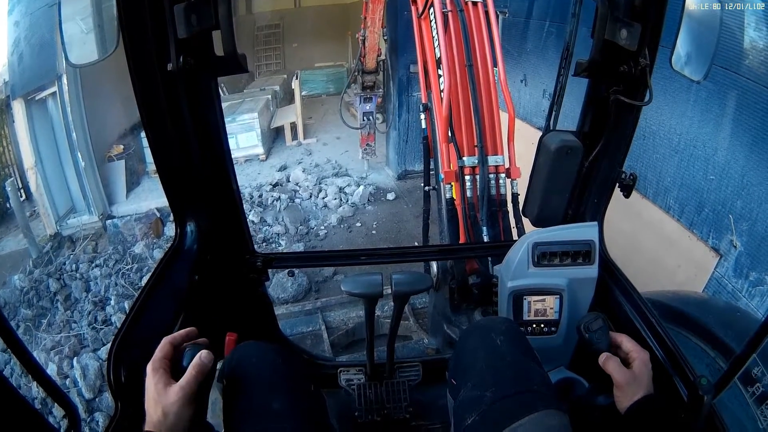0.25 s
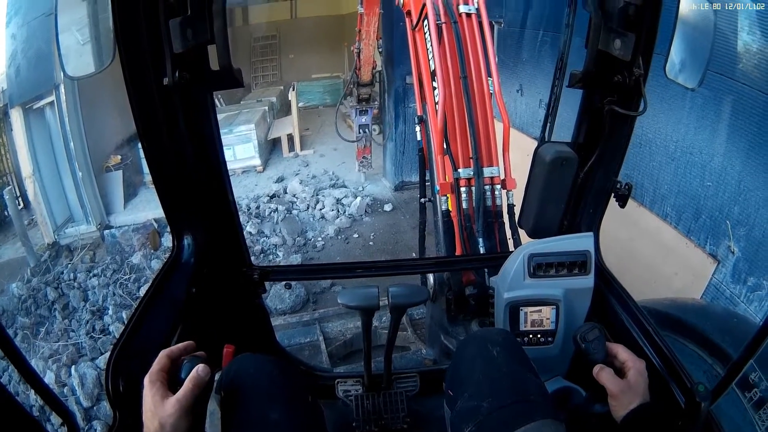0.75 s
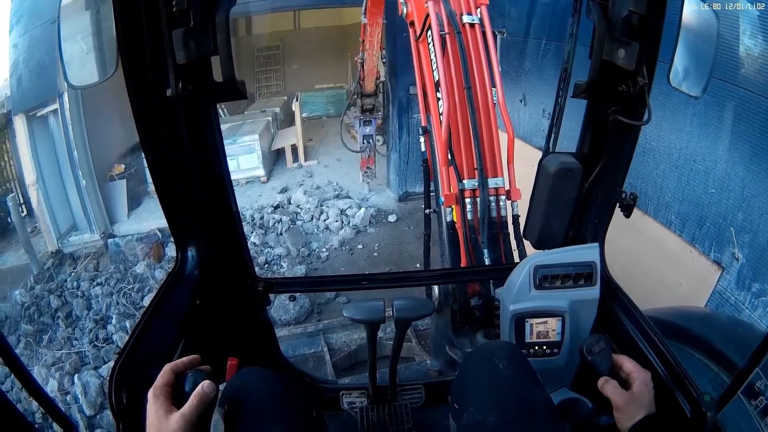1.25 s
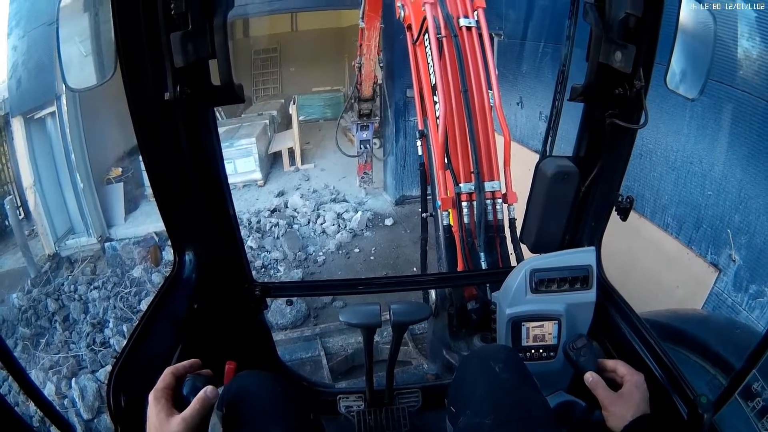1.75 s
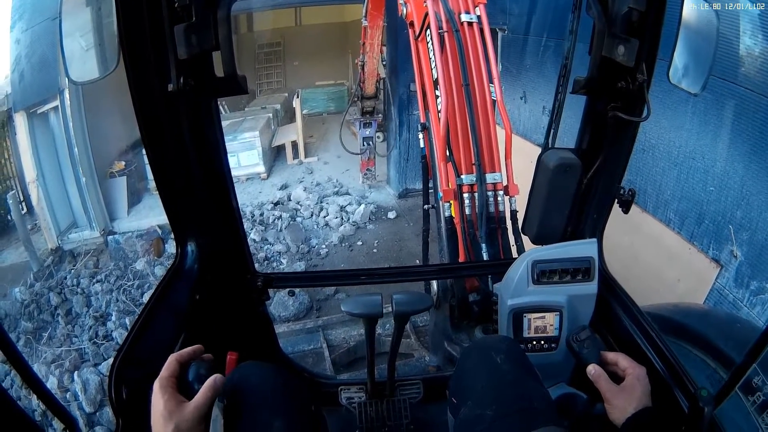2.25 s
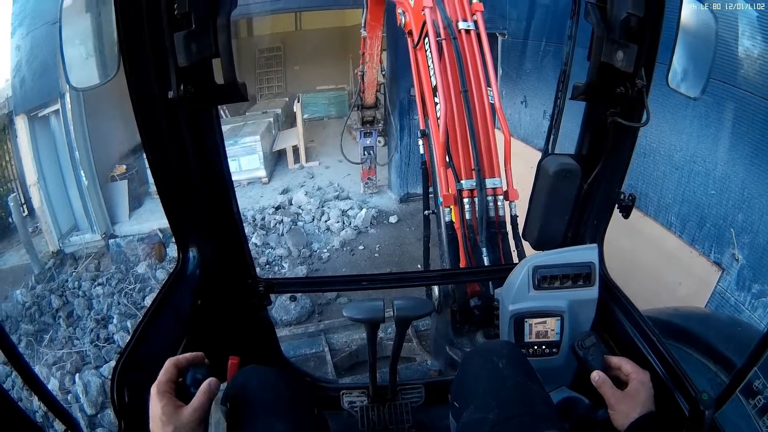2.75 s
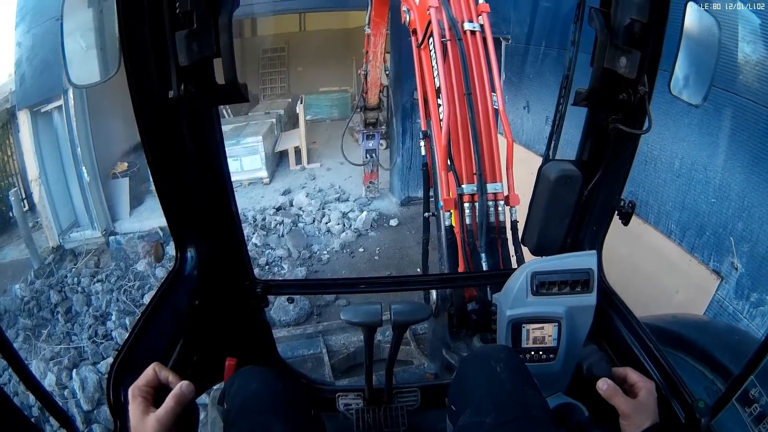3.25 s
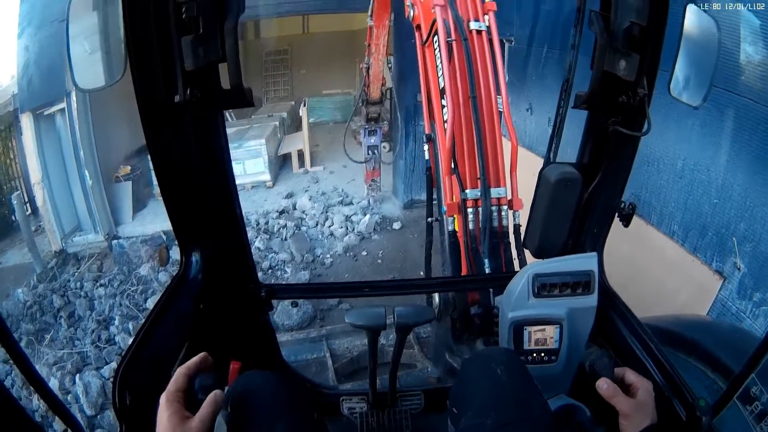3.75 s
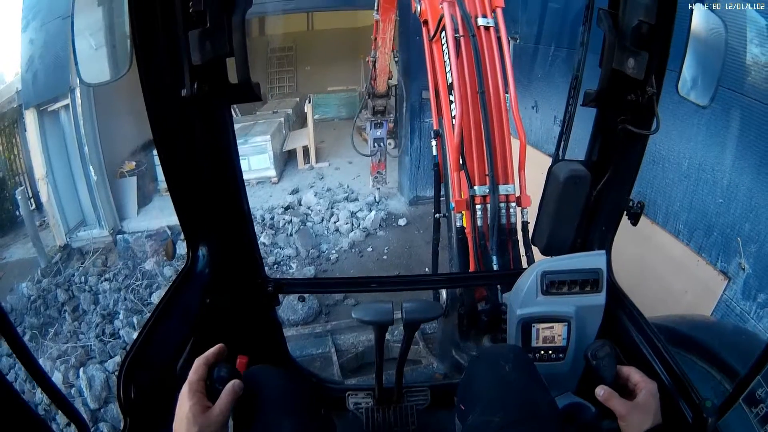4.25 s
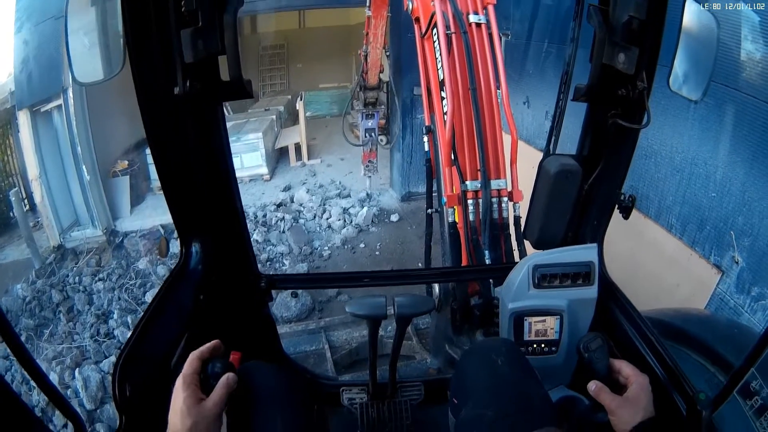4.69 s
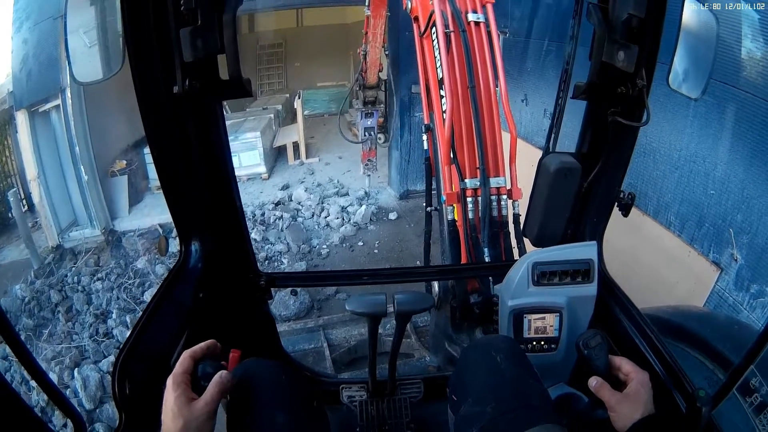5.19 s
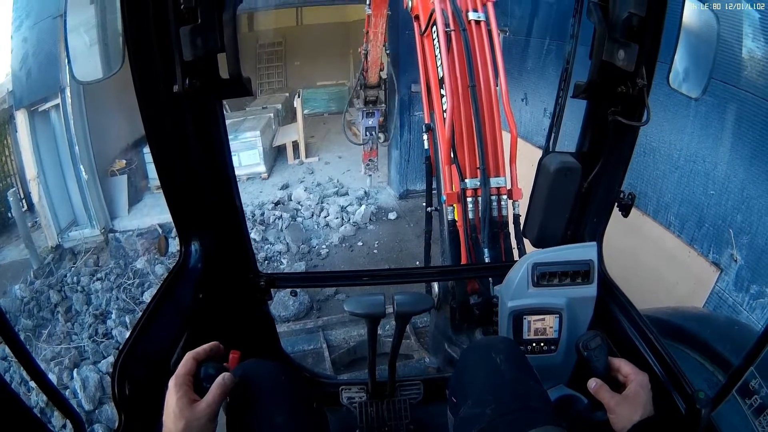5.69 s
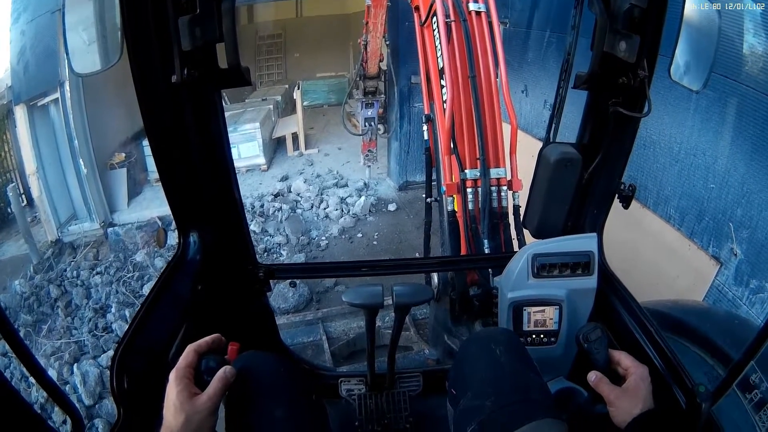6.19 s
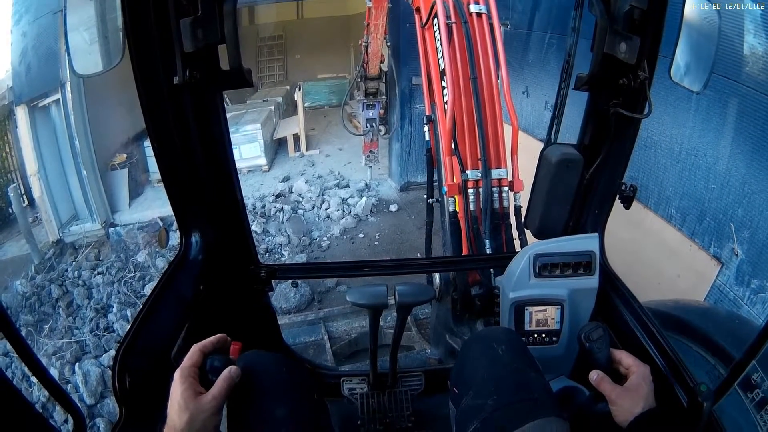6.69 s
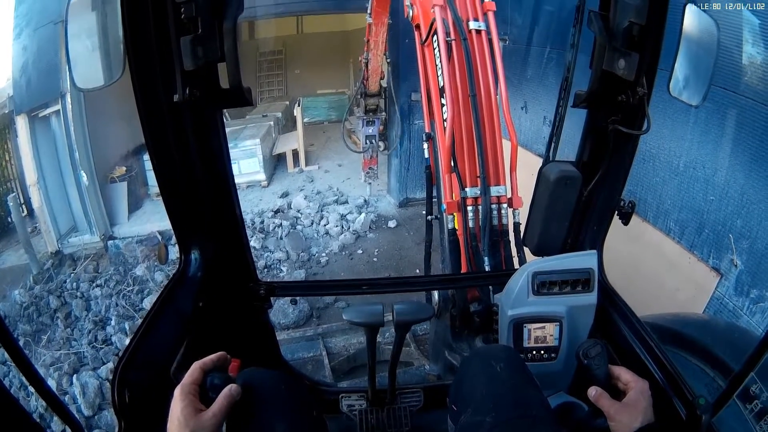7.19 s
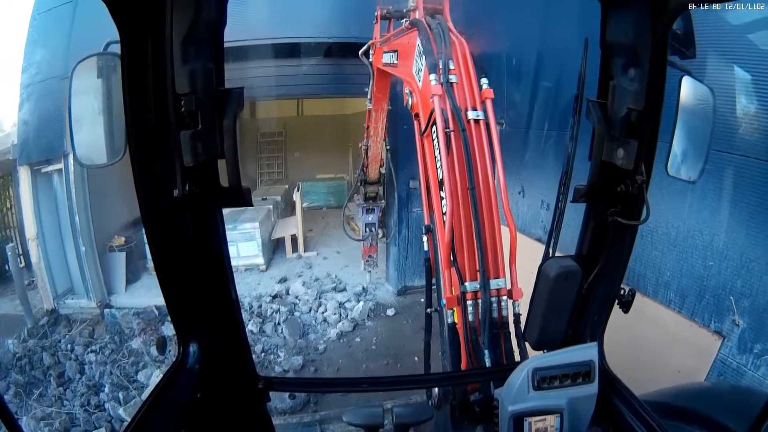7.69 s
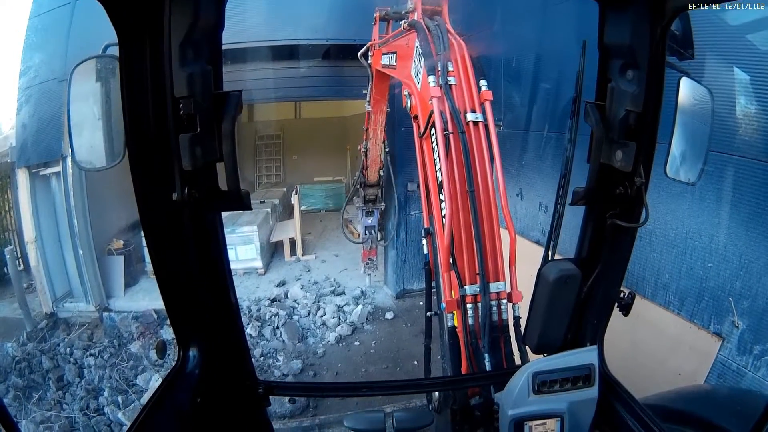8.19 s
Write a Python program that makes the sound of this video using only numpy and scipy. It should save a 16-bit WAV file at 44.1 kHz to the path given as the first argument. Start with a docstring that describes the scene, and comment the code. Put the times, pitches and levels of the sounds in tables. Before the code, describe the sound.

Close, loud machine-gun hammering of a breaker on concrete, heard by a microphone inside the excavator cab. Blows are loose and irregular at first, with a brief firm run near 1.5 seconds, low humming, loose parts slapping and short hydraulic groans. From about 5 seconds they become evenly paced, metallic and firm, with crunching concrete, small high chirps and a steady engine underneath.

```python
"""A hydraulic breaker pounds concrete in a hall at about fifteen blows a second, heard inside its mini excavator's cab.
Each blow excites a fixed arm-and-hall response, ringing arm panels, a noisy wash and the crunch of concrete.
At first the chisel mostly skids: blows are uneven, the cab shudders and hums and its fittings clatter. Near 5 s
it bites and the blows settle into a hard beat. A dry pin chirps and oil whistles in the valves, as shaped tones;
the diesel and its pump drone underneath, as coloured noise and wavering tones."""
import sys
import numpy as np
from scipy import signal
from scipy.fft import rfft, irfft, next_fast_len
from scipy.io import wavfile
from scipy.ndimage import uniform_filter1d, map_coordinates

SR = 44100
rng = np.random.default_rng(int(sys.argv[2]) if len(sys.argv) > 2 else 0)


def persist_wave(psi):
    """Save psi, clipped to +-1, as 16-bit WAV."""
    counts = np.round(np.clip(psi, -1, 1) * 32767).astype(np.int16)
    wavfile.write(sys.argv[1], SR, np.atleast_2d(counts).T)


N = 372204
TIME = np.arange(N) / SR
CUTOFF_HZ = 15600   # upper limit of the rattle bands, and the treble limit


def from_db(db):
    """Logarithmic level: decibels to amplitude gain."""
    return 10 ** (np.asarray(db) / 20)


def rms_one(x):
    """Normalisation: scale to an rms of one."""
    return x / np.sqrt(np.mean(x ** 2) + 1e-20)


def in_time(rows):
    """Linear interpolation: each column of a curve at every sample."""
    s, *columns = np.transpose(rows)
    return [np.interp(TIME, s, c) for c in columns]


def drift(rate_hz):
    """Band-limited random modulation: smooth chance through rate_hz knots a second, rms one."""
    knots = rng.standard_normal(4096)
    coarse = map_coordinates(knots, [TIME[::16] * rate_hz], order=3, mode="wrap")
    return rms_one(coarse).repeat(16)[:N]


def colour(x, spectrum, modes=()):
    """Linear filtering: a broad spectrum with resonance peaks standing on it."""
    size = next_fast_len(len(x))
    hz = np.maximum(np.fft.rfftfreq(size, 1 / SR), 1)
    points, levels = np.transpose(spectrum)
    db = np.interp(np.log(hz), np.log(points), levels)
    for centre, width, lift in modes:
        db = db + lift / (1 + (2 * (hz - centre) / width) ** 2)
    # beyond the end points the response falls 12 dB an octave
    low_skirt = np.minimum(hz / points[0], 1) ** 2
    high_skirt = np.minimum(points[-1] / hz, 1) ** 2
    return irfft(rfft(x, size) * from_db(db) * low_skirt * high_skirt, size)[:len(x)]


def noise(spectrum, modes=(), grain_db=0):
    """Filtered random excitation: noise in grains of uneven size, coloured, rms one."""
    grains = rng.standard_normal(N) * from_db(grain_db * drift(900))
    return rms_one(colour(grains, spectrum, modes))


def clicks(times, sizes):
    """Impulsive excitation: one impulse per event."""
    out = np.zeros(N)
    at = np.clip(np.round(times * SR).astype(int), 0, N - 1)
    np.add.at(out, at, sizes)
    return out


def swells(times, db, rise, decay):
    """Energy superposition: bursts whose powers rise, die and add; db is their level over 50 ms."""
    t = TIME[:SR // 2]
    power = (1 - np.exp(-t / rise)) ** 2 * np.exp(-t / decay)
    power *= (SR // 20) / power.sum()
    total = signal.fftconvolve(clicks(times, from_db(db) ** 2), power)[:N]
    return np.sqrt(np.abs(total))


# Runs of even pace in which the breaker fires firm blows: (first blow [s], last blow [s], number of blows)
FIRM_RUNS = [(1.335, 1.654, 6), (1.723, 1.791, 2), (4.7655, 8.4154, 55)]


def firm_times():
    """Periodic excitation: the moments of the firm blows, evenly spaced within each run."""
    return np.concatenate([np.linspace(first, last, round(count)) for first, last, count in FIRM_RUNS])


# How each firm blow rings the arm, in order, as relative levels:
# (low ring [dB], middle ring [dB], high ring [dB])
FIRM_BLOWS = [(-27.0, -36.0, -30.0), (-33.0, -34.5, -28.0), (-32.5, -41.5, -42.5), (-34.0, -30.5, -27.5),
              (-30.5, -27.0, -33.0), (-27.0, -25.5, -33.5), (-36.0, -25.5, -27.0), (-23.5, -23.0, -21.5),
              (-25.0, -30.5, -28.5), (-33.0, -37.5, -29.0), (-33.0, -39.0, -34.0), (-17.5, -36.5, -29.5),
              (-18.5, -37.5, -30.5), (-20.0, -34.5, -26.5), (-30.5, -28.0, -29.5), (-28.5, -30.0, -27.0),
              (-32.0, -38.5, -29.5), (-30.5, -38.0, -26.5), (-20.0, -30.0, -39.0), (-22.0, -38.5, -28.5),
              (-17.0, -24.5, -26.5), (-17.5, -24.0, -26.0), (-23.0, -25.5, -34.5), (-35.0, -32.5, -32.5),
              (-19.0, -26.0, -32.0), (-17.0, -31.5, -22.5), (-22.0, -29.0, -25.0), (-20.5, -34.5, -38.5),
              (-29.5, -38.5, -31.0), (-29.5, -34.5, -39.5), (-19.5, -23.5, -32.0), (-16.5, -24.5, -23.5),
              (-21.5, -21.5, -24.5), (-21.5, -28.5, -32.0), (-22.0, -41.5, -38.5), (-23.0, -26.0, -31.5),
              (-16.5, -27.0, -40.0), (-18.0, -21.0, -26.0), (-24.5, -24.5, -25.5), (-22.0, -38.0, -29.5),
              (-22.5, -22.5, -34.5), (-30.5, -26.0, -31.5), (-17.5, -28.5, -38.5), (-18.5, -19.5, -27.5),
              (-26.0, -23.0, -29.5), (-28.5, -27.5, -31.5), (-19.0, -23.5, -33.5), (-20.0, -24.5, -40.5),
              (-27.5, -25.0, -24.5), (-17.5, -26.5, -28.0), (-22.5, -24.0, -33.0), (-33.0, -30.0, -36.0),
              (-18.5, -23.5, -40.5), (-21.5, -25.0, -29.0), (-19.0, -26.0, -27.5), (-31.0, -22.0, -31.0),
              (-24.5, -27.0, -30.5), (-30.5, -24.5, -30.5), (-30.0, -22.5, -39.5), (-22.0, -30.5, -37.5),
              (-20.5, -27.0, -30.5), (-28.5, -28.5, -25.5), (-27.5, -29.5, -33.5)]
# The arm's three rings: (mean frequency [Hz], frequency scatter [Hz], gain [dB],
# delay [s], time to full swing [s], bounce level relative to the strike [dB])
ARM_RINGS = [(319.2, 6, 1, 0.005697, 0.0098, -14), (733.5, 24.5, 2.5, 0.00041, 0.0052, -7.5),
             (954, 17, 0.5, 0.00042, 0.0091, -8)]


def arm_rings():
    """Modal ringing: each firm blow swings three panel modes in its own mix; the chisel's bounce repeats it."""
    t = TIME[:SR // 10]
    out = np.zeros(N + SR)
    for s, levels in zip(firm_times(), FIRM_BLOWS):
        bounce_s = s + 0.024 + 0.00201 * rng.standard_normal()
        for level_db, (hz, scatter_hz, gain_db, delay, rise, bounce_db) in zip(levels, ARM_RINGS):
            swing = (t / rise * np.exp(1 - t / rise)) ** 2
            for start, db in ((s, level_db), (bounce_s, level_db + bounce_db)):
                ring_hz = hz + scatter_hz * rng.standard_normal()
                ring = swing * np.sin(2 * np.pi * ring_hz * t)
                out[int((start + delay) * SR):][:len(t)] += from_db(db + gain_db) * ring
    return out[:N]


# Blows on which the chisel skids: (time [s], relative knock level [dB], relative cab rattle level [dB])
SKIDDING_BLOWS = [(0.02, -22.5, -41.5), (0.067, -29, -37), (0.127, -27, -45), (0.21, -26, -52),
                  (0.264, -27.5, -47), (0.327, -23, -45.5), (0.389, -31, -42), (0.439, -29.5, -40),
                  (0.489, -28, -52), (0.555, -27, -48), (0.61, -29.5, -42), (0.664, -25, -40),
                  (0.735, -29, -49), (0.796, -32, -47), (0.85, -31, -43.5), (0.904, -27.5, -41),
                  (0.965, -29, -38.5), (1.02, -22.5, -44), (1.085, -27, -48), (1.151, -28, -46.5),
                  (1.208, -32, -49), (1.266, -28, -45), (1.867, -29.5, -48), (1.923, -25, -42.5),
                  (1.995, -28, -45), (2.029, -36, -42), (2.073, -40, -56), (2.121, -31.5, -49),
                  (2.164, -29, -53), (2.211, -33, -49.5), (2.261, -27.5, -45.5), (2.314, -34, -48),
                  (2.379, -28.5, -41), (2.479, -28, -42.5), (2.536, -26, -39.5), (2.584, -25.5, -45),
                  (2.638, -27, -35.5), (2.688, -22.5, -35), (2.745, -24.5, -39), (2.786, -23, -42),
                  (2.845, -27, -39), (2.905, -28, -40.5), (2.96, -29.5, -40), (3.03, -28, -36),
                  (3.109, -27.5, -45), (3.176, -30.5, -46), (3.254, -27, -46.5), (3.311, -30.5, -43.5),
                  (3.398, -31, -36.5), (3.507, -38, -43.5), (3.594, -28.5, -39.5), (3.687, -43, -45.5),
                  (3.734, -27, -40), (3.79, -28.5, -42), (3.84, -34, -36), (3.885, -27.5, -40),
                  (3.943, -27.5, -42.5), (4.015, -27.5, -40), (4.07, -30, -45.5), (4.124, -29, -48),
                  (4.209, -29, -43), (4.286, -29.5, -42), (4.359, -35.5, -49), (4.42, -31, -49),
                  (4.504, -23, -40.5), (4.562, -26.5, -45), (4.627, -29, -43.5), (4.702, -27.5, -45)]
# How firmly the chisel sits on solid concrete: (time [s], bite [0-1])
BITE = [(0, 0.53), (1.1, 0.27), (1.75, 0.68), (2.1, 0.3), (3.5, 0.03), (4.2, 0.26), (4.75, 0.37),
        (5.05, 0.84), (8.44, 0.76)]
# firm blows: mean relative levels [dB], and the share of their rings' ups and downs that the knock follows
FIRM_KNOCK_DB, KNOCK_FOLLOWS, FIRM_RATTLE_DB = -24.5, 0.61, -45.5
# the rattle swells and ebbs in a slow beat, the more so the firmer the bite
BEAT_HZ, BEAT_CREST_S, RATTLE_BEAT_DB = 2.615, 4.795, 3


def blows():
    """Excitation sequence: time, knock level, rattle level and bite of every blow, skidding or firm."""
    ring_db = np.mean(FIRM_BLOWS, axis=1)
    firm_knock_db = FIRM_KNOCK_DB + KNOCK_FOLLOWS * (ring_db - ring_db.mean())
    firm = [(s, db, FIRM_RATTLE_DB) for s, db in zip(firm_times(), firm_knock_db)]
    skidding = [tuple(row) for row in SKIDDING_BLOWS]
    times, knock_db, rattle_db = np.transpose(sorted(skidding + firm))
    bite = np.clip(np.interp(times, *np.transpose(BITE)), .02, .97)
    beat = bite * np.cos(2 * np.pi * BEAT_HZ * (times - BEAT_CREST_S))
    return times, knock_db, rattle_db + RATTLE_BEAT_DB * beat, bite


# Spectrum of the knock: (frequency [Hz], relative level [dB])
KNOCK_SPECTRUM = [(100, -40), (195, -17), (245, -26), (305, 3.5), (380, -12.5), (620, -18.5), (1100, -15.5),
                  (1400, -45), (1800, -28.5), (3500, -58)]
# Resonances of the arm: (frequency [Hz], width [Hz], height above the spectrum [dB])
ARM_MODES = [(343, 12, 8.5), (467, 17, 11), (550.8, 20, 20), (687.4, 21, 16), (1738, 21, 23)]


def knocks(times, db, crack_s, ring_s, ring_share):
    """Impulse response: each blow rings arm and hall alike, a crack and then dense dying reflections."""
    t = TIME[:2 ** 15]
    decay = np.exp(-t / crack_s) + ring_share * np.exp(-t / ring_s)
    reflections = rng.standard_normal(len(t)) * decay
    # keep only the phases, so that the spectrum alone sets the colour
    even = irfft(np.exp(1j * np.angle(rfft(reflections))))
    lead = SR // 100   # room for the filter's early ripple
    response = colour(np.roll(even, lead), KNOCK_SPECTRUM, ARM_MODES)[:SR // 4]
    response *= np.sqrt((SR // 20) / np.sum(response ** 2))
    return signal.fftconvolve(clicks(times, from_db(db)), response)[lead:][:N]


# Spectrum of the hall, for the wash and the engine's roar: (frequency [Hz], relative level [dB])
HALL_SPECTRUM = [(90, 8), (140, -8), (200, 2), (255, -24.5), (335, -0.5), (420, 0.5), (640, -4), (770, -5),
                 (850, -9.5), (970, -4), (1120, -4.5), (1400, -24), (4000, -54)]
# Spectrum of crushed concrete, also used for the upper roar: (frequency [Hz], relative level [dB])
CRUNCH_SPECTRUM = [(900, 5.5), (1300, -4), (1750, 2.5), (1950, 2.5), (2350, -2), (2600, -8.5), (2900, -8),
                   (3300, -15.5), (6000, -14.5)]


def breaker(times, knock_db, rattle_db, bite):
    """Coherent and diffuse impact: bite shares each blow's energy between a repeatable knock and a rough wash."""
    firm_db = knock_db + 10 * np.log10(bite)
    loose_db = knock_db + 10 * np.log10(1 - bite)
    knock = from_db(-5.5) * knocks(times + 0.00102, firm_db, crack_s=0.0079, ring_s=0.066, ring_share=1.0)
    wash_swell = swells(times, loose_db, rise=0.0022, decay=0.031)
    wash = from_db(-0.47) * noise(HALL_SPECTRUM, grain_db=3.5) * wash_swell
    # the crunch swells on the strike and again on the chisel's bounce
    crunch_db = 0.45 * knock_db + 0.45 * rattle_db
    strike = swells(times + 0.00036, crunch_db - 0.5, rise=0.003, decay=0.023)
    bounce_db = crunch_db - 6.0 + 10 * np.log10(bite)
    bounce = swells(times + 0.0267, bounce_db, rise=0.0024, decay=0.0052)
    crunch = from_db(-5.5) * noise(CRUNCH_SPECTRUM, grain_db=-0.2) * np.hypot(strike, bounce)
    return knock + arm_rings() + wash + crunch


# How hard the cab shudders on its mounts:
# (time [s], level at the blow rate [dB], level at twice that rate [dB])
SHUDDER = [(0.1, -34, -5.5), (0.28, -31, -19), (0.4, -27, -10.5), (0.72, -19, -10.5), (1.0, -20.5, -7.5),
           (1.3, -14, -13.5), (1.5, -22, -27), (1.88, -35, -19.5), (2.0, -12.5, -10.5), (2.17, -10, -28),
           (2.45, -13, -11), (2.85, -24, -11.5), (3.15, -23, -17), (3.41, -21.5, -8), (3.57, -19, -18.5),
           (3.8, -13, -18), (4.0, -19, -20), (4.27, -16, -10.5), (4.7, -26, -21.5), (5.4, -33, -27)]
# Cab air pumped in time with the blows: (time [s], level before the order levels [dB])
BOOM = [(1.2, -26), (1.7, -23.5), (2.1, -38), (3.6, -45), (4.1, -28), (4.7, -28.5), (5.1, -25.5),
        (6, -26.5)]
# Harmonics of the boom: (multiple of the blow rate [-], relative level [dB])
BOOM_ORDERS = [(1, 10.5), (2, -4.5), (3, 8), (4, -13), (5, -17), (6, -14), (7, -20), (8, -41), (9, -15.5)]


def cab_boom(times):
    """Forced vibration: the cab shudders with the skidding tool, and throbs and thumps with all the blows,
    more or less strongly throughout."""
    before, after = 2 * times[0] - times[1], 2 * times[-1] - times[-2]
    times = np.concatenate([[before], times, [after]])
    # the piston's recoil presses on the cab just before it strikes
    turns = np.interp(TIME + 0.01702, times, np.arange(len(times)))
    once_db, twice_db = in_time(SHUDDER)
    # the heavy cab evens out the jerky pace
    sway = 2 * np.pi * uniform_filter1d(turns, size=SR // 9, mode="nearest")
    shudder = from_db(twice_db) * np.sin(2 * sway) - from_db(once_db) * np.sin(sway)
    throb = sum(from_db(db) * np.cos(2 * np.pi * round(multiple) * turns) for multiple, db in BOOM_ORDERS)
    # a short tone at 13 times the blow rate, in the first half of each cycle
    push = np.maximum(np.sin(2 * np.pi * turns), 0)
    thump = from_db(-4.0) * push * np.sin(2 * np.pi * 13.0 * (turns % 1))
    return np.sqrt(2) * (shudder + from_db(in_time(BOOM)[0]) * (throb + thump))


# A low hum of the cab near 100 Hz, stirred by the blows and wandering in pitch:
# (time [s], mean frequency [Hz], relative level [dB])
HUM = [(0, 94.8, -29), (.3, 101.7, -25.5), (.75, 96.6, -23.5), (1.1, 92, -28.5), (1.9, 103, -24),
       (2.35, 95, -46), (2.62, 109, -29.5), (2.85, 97.3, -22), (2.95, 96.6, -35), (3.1, 100.1, -17),
       (3.3, 119.9, -31.5), (3.65, 128, -27.5), (3.88, 97.1, -25), (4.2, 90.1, -30.5), (4.5, 102, -20),
       (4.9, 99.9, -22.5), (5.2, 101, -28.5), (8.44, 102, -36)]
HUM_DB, HUM_WAVER_HZ = -1.5, 2.26   # trim on the hum's levels, rms waver of its pitch


def cab_hum():
    """Cavity or panel resonance: a single low tone whose pitch and level follow curves and waver at random."""
    hum_hz, hum_db = in_time(HUM)
    phase = 2 * np.pi * np.cumsum(hum_hz + HUM_WAVER_HZ * drift(8)) / SR
    return np.sqrt(2) * from_db(hum_db + HUM_DB + 2.8 * drift(6)) * np.sin(phase)


# Resonances of the cab fittings: (frequency [Hz], width [Hz], height above the spectrum [dB])
FITTING_MODES = [(4110, 40, 11), (4600, 22, 13.2), (5470, 34, 3.1), (6870, 104, 10.3)]


def jingle(spectrum, patchy_db):
    """Independent narrow-band sources: many small parts chatter, each at moments of its own; rms one."""
    white = rng.standard_normal((3, N))
    edges = np.linspace(1500, CUTOFF_HZ, 25)
    out = 0
    for k, band in enumerate(zip(edges, edges[1:])):
        band_filter = signal.butter(2, band, "band", fs=SR, output="sos")
        part = signal.sosfilt(band_filter, white[k % 3])
        out = out + part * from_db(patchy_db * drift(170))
    return rms_one(colour(out * from_db(2.0 * drift(800)), spectrum, FITTING_MODES))


# Spectrum of the rattle: (frequency [Hz], relative level [dB])
RATTLE_SPECTRUM = [(2200, 4.5), (3400, -6), (4300, -7), (5000, 3), (5750, 4), (6300, -18), (7100, 4),
                   (8250, -6), (8900, 1.5), (9800, -2), (12000, -1.5), (13200, -9), (15500, -38)]
# Loose fittings slapping: (time [s], relative level [dB])
CLATTER = [(0.089, -15), (0.147, -14), (0.4626, -18.5), (0.68, -18.5), (1.033, -14.5), (2.001, -16.5),
           (2.478, -20), (2.555, -18), (2.71, -14), (2.7662, -16), (2.806, -10.5), (2.8175, -23),
           (2.8694, -14.5), (2.9223, -16), (2.9766, -20), (3.7953, -22), (3.848, -16.5), (3.892, -18.5),
           (4.327, -18.5), (4.545, -20), (4.796, -12.5), (7.8815, -20.5)]
# Spectrum of the slaps: (frequency [Hz], relative level [dB])
SLAP_SPECTRUM = [(1800, 9.5), (3500, -1.5), (5500, 2), (12000, 1.5), (15500, -16)]


def fittings(times, rattle_db, bite):
    """Vibro-impact: blows shake loose fittings on the push and on the rebound; hard jolts make them slap."""
    push = swells(times + 0.0016, rattle_db - 5.0, rise=0.0031, decay=0.0047)
    rebound_db = rattle_db + 1.0 + 10 * np.log10(bite)
    rebound = swells(times + 0.013, rebound_db, rise=0.0012, decay=0.026)
    # skidding blows give a looser shake
    shake_db = rattle_db - 1.0 + 10 * np.log10(1 - bite)
    shake = swells(times + 0.015, shake_db, rise=0.0039, decay=0.015)
    rattle = jingle(RATTLE_SPECTRUM, patchy_db=3.0) * np.sqrt(push ** 2 + rebound ** 2 + shake ** 2)
    slap_s, slap_db = np.transpose(CLATTER)
    slap = swells(slap_s, slap_db - 20.5, rise=0.00037, decay=0.015)
    return rattle + noise(SLAP_SPECTRUM, FITTING_MODES, grain_db=2.0) * slap


# mean chirp level, its delay after the blow and its length
CHIRP_DB, CHIRP_AFTER_S, CHIRP_S = -44.5, 0.0205, 0.018
# middle pitch, total upward glide and rms roughness of pitch
CHIRP_HZ, CHIRP_GLIDE_HZ, CHIRP_ROUGH_HZ = 11810, 1110, 450


def chirps(times):
    """Stick-slip friction: on each rebound a dry pin slips for a moment with a rough, rising squeak."""
    out, rough = np.zeros(N + SR), drift(1500)
    progress = np.linspace(0, 1, int(CHIRP_S * SR))
    glide_hz = CHIRP_GLIDE_HZ * (np.sqrt(progress) - .5)
    for s in times:
        start = int((s + CHIRP_AFTER_S) * SR)
        roughness = rough.take(start + np.arange(len(progress)), mode="wrap")
        pitch = CHIRP_HZ + glide_hz + CHIRP_ROUGH_HZ * roughness
        level = from_db(CHIRP_DB + 2 * rng.standard_normal()) * np.sin(np.pi * np.sqrt(progress))
        out[start:][:len(progress)] += np.sqrt(2) * level * np.sin(2 * np.pi * np.cumsum(pitch) / SR)
    return out[:N]


# Oil singing in valves and hoses: (start [s], end [s], start frequency [Hz], end frequency [Hz],
# level before flutter [dB])
WHINES = [(0, 0.12, 2880, 2930, -47), (0.88, 0.96, 5480, 5440, -49), (0.196, 0.465, 2870, 2870, -50.5),
          (0.534, .66, 2888, 2840, -51), (0.725, 0.968, 2860, 2920, -48.5), (0.208, 0.412, 8020, 8140, -54),
          (.54, 0.624, 5180, 5250, -49), (2.729, 2.9, 593, 660, -37), (3.19, 3.431, 667, 661, -37),
          (3.58, 3.686, 399, 379, -33), (3.588, 3.62, 7000, 7780, -42), (4.13, 4.394, 219.2, 108.6, -40)]


def hydraulics():
    """Flow-excited tones: oil forced through part-open valves whistles and groans unsteadily."""
    out = np.zeros(N)
    waver, flutter = 0.31 * drift(140), from_db(2.5 * drift(60))
    for start, end, from_hz, to_hz, db in WHINES:
        span = (TIME >= start) & (TIME < end)
        progress = np.linspace(0, 1, span.sum())
        hz = from_hz + (to_hz - from_hz) * progress + np.sqrt(from_hz) * waver[span]
        opening = np.sqrt(np.abs(np.sin(np.pi * progress)))
        level = np.sqrt(2) * from_db(db) * opening * flutter[span]
        out[span] += level * np.sin(2 * np.pi * np.cumsum(hz) / SR)
    return out


# Diesel and cab panels rumbling under load: (time [s], relative level [dB])
RUMBLE = [(0.0, -29), (0.91, -24), (1.8, -19.5), (2.05, -24), (2.4, -22.5), (3.2, -20.5), (4.3, -21.5),
          (4.65, -18.5), (5.05, -24), (8.44, -26)]
# Spectrum of the rumble: (frequency [Hz], relative level [dB])
RUMBLE_SPECTRUM = [(45, 4), (62, -0.5), (80, -9), (98, -7.5), (122, -12.5), (150, -27.5), (260, -52)]
# The arm groaning as it is pressed down onto the chisel: (time [s], level [dB])
STRAIN = [(2.9, -31), (3.5, -28.5), (4.7, -28), (5.2, -31), (8.44, -32)]
# Pump and engine tones: (mean frequency [Hz], level before wavering [dB])
DRONE = [(344.4, -37), (689, -46.5)]


def engine():
    """Broadband and tonal machine noise: diesel rumble, steady roar, the straining arm, and wavering pump tones."""
    rumble_db = in_time(RUMBLE)[0] - 0.67 * in_time(BITE)[0] + 4.5
    rumble = from_db(rumble_db) * noise(RUMBLE_SPECTRUM)
    roar = from_db(-34.5) * noise(HALL_SPECTRUM) + from_db(-43.0) * noise(CRUNCH_SPECTRUM)
    groan_spectrum = [(140, -4.0), (200, -7.0), (320, -5.5), (480, -11.0)]   # (Hz, relative dB)
    groan = from_db(in_time(STRAIN)[0]) * noise(groan_spectrum)
    # the tones share one slightly uneven pace
    pace = np.cumsum(1 + 0.0041 * drift(7)) / SR
    tones = sum(from_db(db + 1.73 * drift(8.3)) * np.sin(2 * np.pi * hz * pace) for hz, db in DRONE)
    return rumble + roar + groan + np.sqrt(2) * tones


def scene():
    """Linear superposition: everything as heard from the seat."""
    times, knock_db, rattle_db, bite = blows()
    pounding = breaker(times, knock_db, rattle_db, bite) + cab_boom(times) + cab_hum()
    loose_parts = fittings(times, rattle_db, bite) + chirps(times)
    return (pounding + loose_parts + hydraulics() + engine())[None]


# Hollow in the microphone's response as it tilts: (time [s], centre frequency [Hz])
NOTCH = [(0, 1200), (7.1, 1236), (7.9, 1155), (8.44, 1138)]


def notch(x, width_hz, depth_db):
    """Destructive interference: a reflection close to the microphone weakens one narrow band."""
    hz, s, frames = signal.stft(x, SR, nperseg=2048)
    centre = np.interp(s, *np.transpose(NOTCH))
    gain = from_db(depth_db / (1 + (2 * (hz[:, None] - centre) / width_hz) ** 4))
    return signal.istft(frames * gain, SR)[1][..., :N]


def record(dry):
    """Transducer limits: the microphone has a hollow, overloads on the deepest swings, and the top is cut."""
    x = notch(dry, width_hz=118, depth_db=-11.5)
    clipped = x / (1 + np.abs(x / .71) ** 14) ** (1 / 14)
    top_cut = signal.cheby2(14, 70, CUTOFF_HZ * 1.05, fs=SR, output="sos")
    return signal.sosfilt(top_cut, clipped)


dry = scene()
out = record(dry)
persist_wave(out)
```